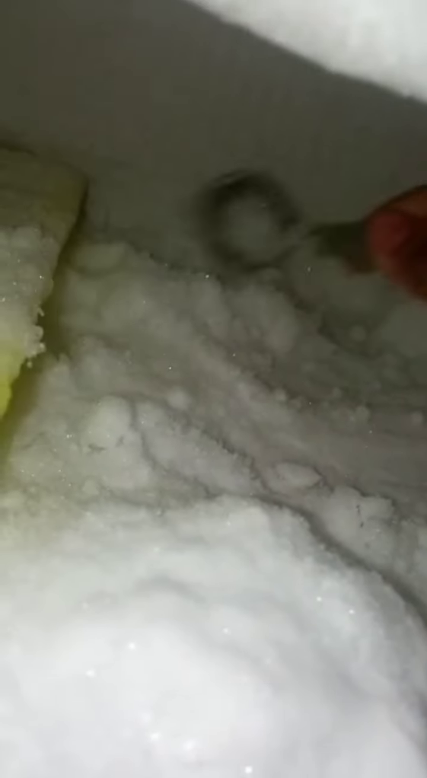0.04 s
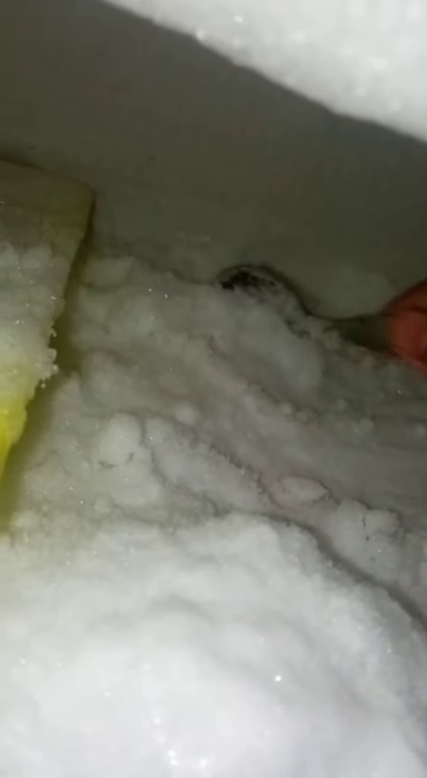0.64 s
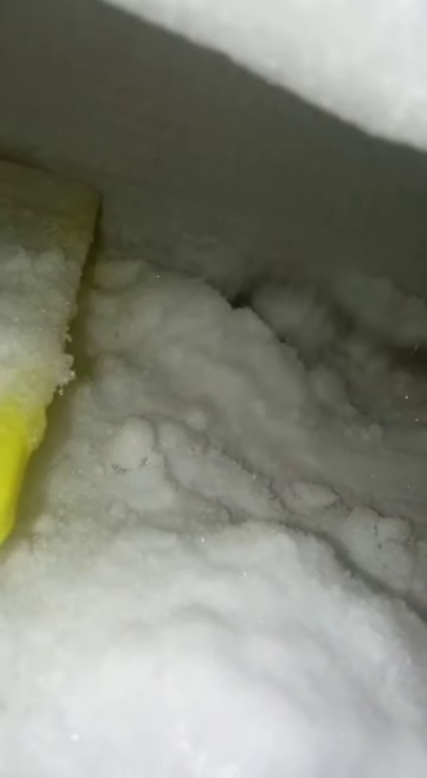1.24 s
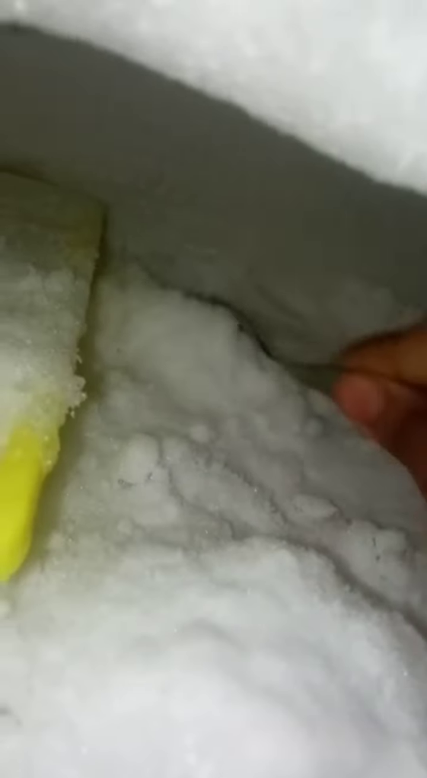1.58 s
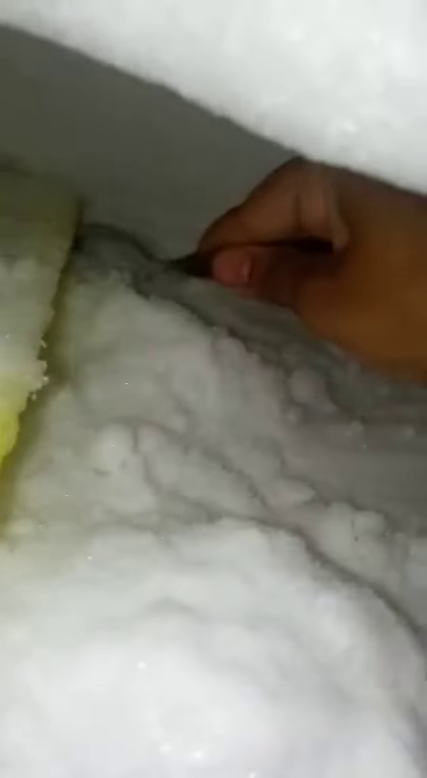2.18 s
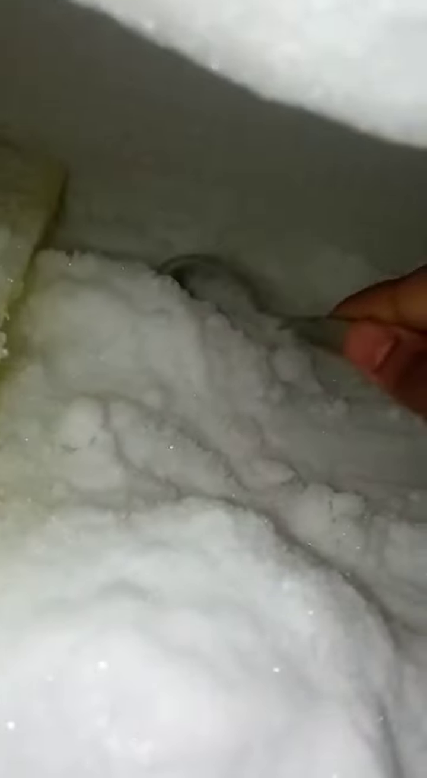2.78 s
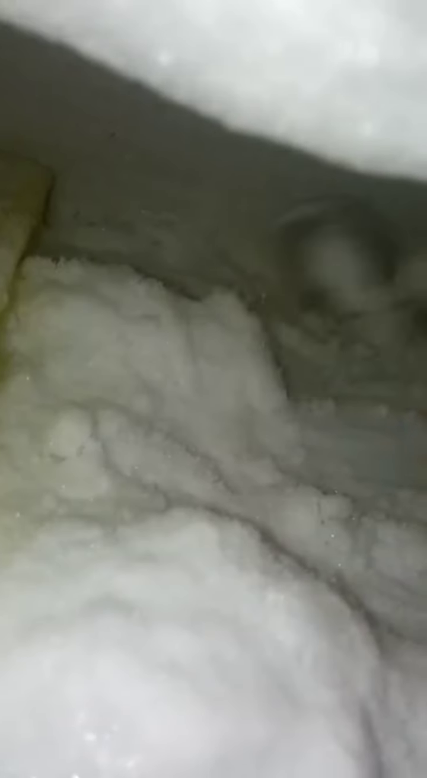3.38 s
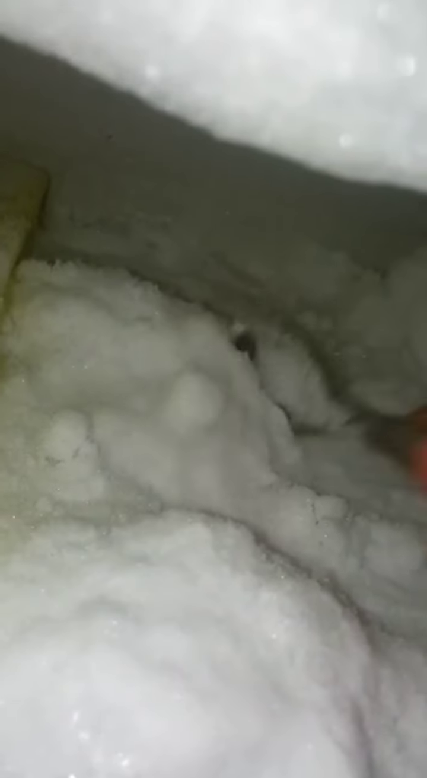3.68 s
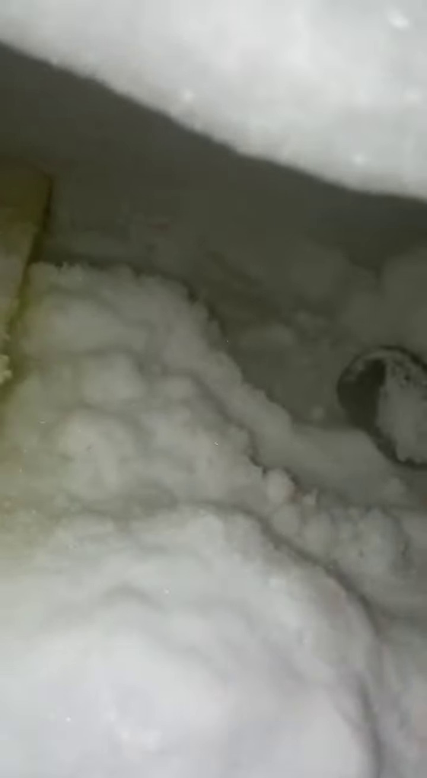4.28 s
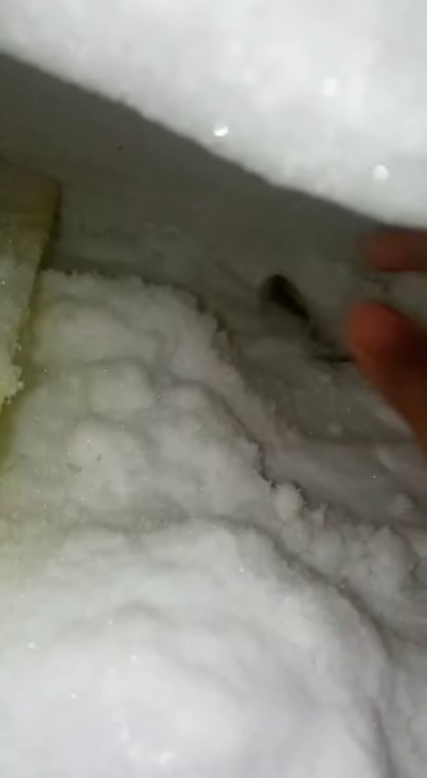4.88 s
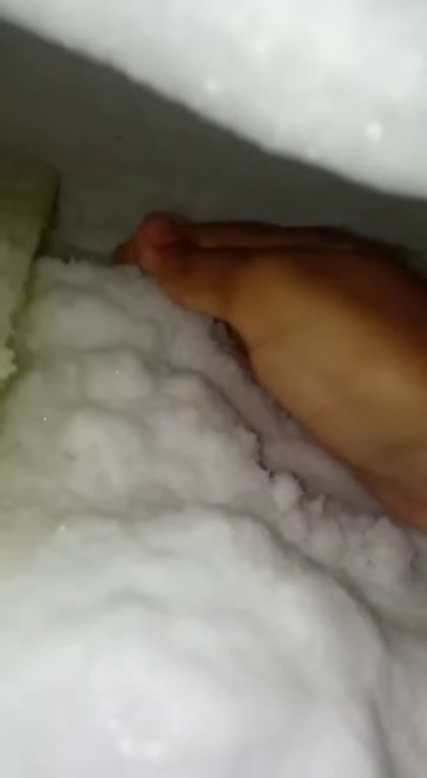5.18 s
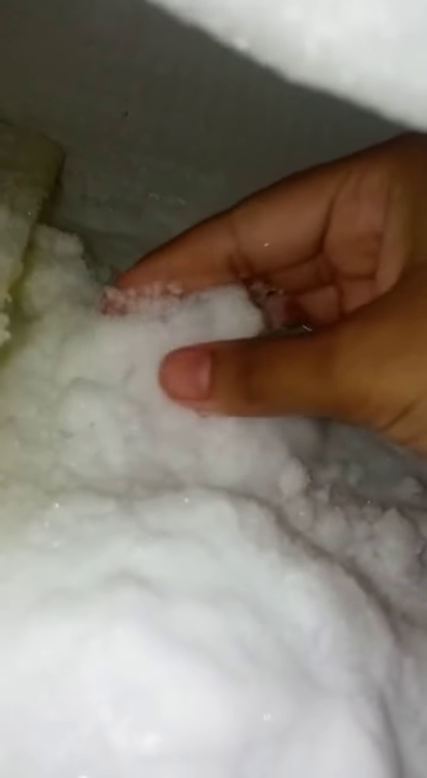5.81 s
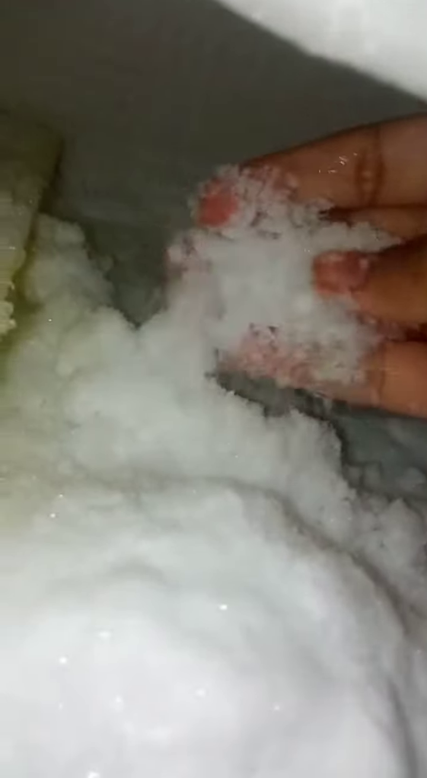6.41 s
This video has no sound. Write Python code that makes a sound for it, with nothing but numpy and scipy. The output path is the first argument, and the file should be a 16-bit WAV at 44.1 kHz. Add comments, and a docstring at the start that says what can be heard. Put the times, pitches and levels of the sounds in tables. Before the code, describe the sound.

A metal spoon jabs and scrapes thick freezer frost in crunchy strokes, clatters down, then fingers softly gather the loose crystals.

```python
"""Close up, a metal spoon jabs into thick freezer frost and drags it loose, stroke after stroke.
Each jab thuds in the hollow freezer wall; on each pull, breaking ice crystals fizz, rattle the spoon
and shake that wall. At 4.8 s the spoon is put down with a clatter and rings briefly.
From 5.1 s fingers softly gather the loose frost, over a low rumble and faint hiss heard throughout."""
import sys
import numpy as np
from scipy import signal
from scipy.fft import rfft, irfft
from scipy.io import wavfile
from scipy.ndimage import uniform_filter1d

SR = 44100
rng = np.random.default_rng(int(sys.argv[2]) if len(sys.argv) > 2 else 0)


def to_wav(s):
    """Save 16-bit WAV."""
    ch = np.atleast_2d(s).T  # columns
    pcm = np.round(np.clip(ch, -1, 1) * 32767)  # PCM
    wavfile.write(sys.argv[1], SR, pcm.astype(np.int16))


N = 293265
TIME = np.arange(N) / SR
HZ = np.fft.rfftfreq(16384, 1 / SR)  # frequency grid of the EQ curves


# pulls through the frost: (start [s], attack [s], hold [s], fizz level [dB], sag over the hold [dB],
# spoon rasp over fizz [dB], wall rumble over fizz [dB])
PULLS = [(0.0, 0.0013, 0.053, -53.5, 8.5, 4.5, 7.5), (0.078, 0.026, 0.086, -76, 3.5, 0.5, 12),
         (0.223, 0.022, .008, -51.5, -1, 4, 15), (0.287, 0.014, 0.098, -49.5, 10.5, 2, 3.5),
         (0.551, 0.03, 0.023, -43.5, 3.5, 4.5, 11), (0.601, 0.032, 0.13, -56, 4, 5.5, 11),
         (0.825, 0.015, 0.01, -44, 14, -2, 2), (1.018, 0.031, 0.017, -47, -1.5, 4.5, 9.5),
         (1.107, 0.022, .05, -56, 5, 6, 6.5), (1.181, .01, 0.083, -51, -0.5, 1, 2),
         (1.476, 0.077, 0.15, -47, 14, 5.5, 7), (1.699, 0.018, 0.049, -52.5, 11, 0, 3),
         (2.025, .01, 0.19, -59.5, 4, 8.5, 13), (2.167, .022, .225, -48, 4.5, 10, 10),
         (2.411, 0.026, 0.076, -43.5, 11, 5, 3.5), (2.764, 0.061, 0.14, -44, 18, 4.5, 8),
         (3.135, 0.16, 0.011, -49, -1, 4, 5.5), (3.32, 0.023, 0.057, -61.5, -1, 2, 8.5),
         (3.573, 0.066, 0.07, -45.5, 10, 6, 5.5), (3.748, 0.0094, 0.0082, -53, 11.5, -2.5, 3.5),
         (3.929, 0.059, 0.14, -45, 5.5, 5, 4), (4.142, 0.051, 0.0039, -52.5, 10.5, -3.5, 4),
         (4.35, 0.05, 0.027, -54, 12, 3, 2), (4.805, .008, .11, -64.5, 1.5, 4.5, 16.5),
         (4.936, 0.043, .004, -61.5, 8.5, 5.5, 15.5)]
def pull_envelopes():
    """How hard the pulls drive wall, spoon and crystals; the wall follows the force less steeply."""
    wall, spoon, ice = np.zeros((3, N))
    for start, attack_s, hold_s, fizz_db, sag_db, rasp_db, rumble_db in PULLS:
        force_db = stroke_db(attack_s, hold_s, sag_db)
        add(wall, start, amp(fizz_db + rumble_db + 0.64 * force_db) ** 2)  # overlaps sum in power
        add(spoon, start, amp(fizz_db + rasp_db + force_db) ** 2)
        add(ice, start, amp(fizz_db + force_db) ** 2)
    return np.sqrt([wall, spoon, ice])


def drag():
    """The edge sticks and slips through the frost: gritty forces on wall, spoon and crystals."""
    slip = evened(amp(1.45 * wander(rate_hz=70)))
    lumps = snaps(per_s=4000, spread_db=2.1)
    crystals = snaps(per_s=15000, spread_db=3.0)
    wall = evened(0.5 * lumps + snaps(per_s=5000, spread_db=-0.55))
    spoon = evened(lumps + 0.6 * crystals)
    flicker = amp(wander(rate_hz=330) + 0.5 * wander(rate_hz=26))
    ice = evened((crystals + 0.36 * lumps) * flicker)
    return slip * pull_envelopes() * np.array([wall, spoon, ice])


# jabs into the frost: (time [s], wall thud [dB], spoon clack [dB], ice crunch [dB], knock pitch [Hz])
JABS = [(0.2197, -34, -44.5, -52, 920), (0.5425, -29.5, -49.5, -55, 622), (1.0222, -34, -53, -52.5, 647),
        (1.1857, -42, -48.5, -46.5, 650), (1.4876, -28.5, -47.5, -56.5, 629),
        (2.0564, -34.5, -39, -61, 660), (2.0762, -41, -47.5, -59, 645), (2.7395, -29, -51, -54, 611),
        (3.1478, -47, -55, -54, 593), (3.5488, -28.5, -46, -54.5, 490), (3.9072, -45, -46.5, -51.5, 2400),
        (4.326, -50.5, -46, -52, 2470)]
# metal hits hard ice, last of all as the spoon is put down:
# (time [s], spoon clack [dB], knock [dB], knock pitch [Hz], wall thud [dB])
CLACKS = [(0.2963, -51, -49, 3245, -53), (2.215, -28, -29, 1085, -57), (2.2395, -38, -32.5, 2320, -36),
          (2.561, -61, -53.5, 1060, -44), (3.6621, -48.5, -44, 2827, -50), (3.9896, -64, -40.5, 2600, -57),
          (4.8109, -38, -39.5, 897, -38), (4.8134, -41.5, -33.5, 903, -33.5),
          (4.824, -42.5, -34, 482, -40.5), (4.8922, -45.5, -50, 2290, -37.5)]
def blows(jab_knock_over_thud_db=-6.5, chip_db=-58.5):
    """Each hit shoves the wall, clacks the spoon, crushes crystals and knocks on the struck spot."""
    wall, spoon, ice, knocks = np.zeros((4, N))
    hits = [(s, thud, clack, crunch, thud + jab_knock_over_thud_db, hz)
            for s, thud, clack, crunch, hz in JABS]
    hits += [(s, thud, clack, chip_db, knock_db, hz) for s, clack, knock_db, hz, thud in CLACKS]
    for s, thud_db, clack_db, crunch_db, knock_db, hz in hits:
        add(wall, s + 0.00064, amp(thud_db) * burst(decay_s=0.013, rise_s=0.00013, shove=1.0))
        add(spoon, s + 0.0003, amp(clack_db) * burst(decay_s=0.0073, rise_s=0.00052, shove=0.32))
        add(ice, s - 0.002, amp(crunch_db) * burst(decay_s=0.0049, rise_s=0.017))
        cycles = np.interp(knock_db, [-54, -45], [0.7, 3.1])  # a light touch is only a dry tick
        add(knocks, s + 0.00047, amp(knock_db) * knock(hz, cycles, rise_s=0.002))
    return np.array([wall, spoon, ice]), knocks


# tone of the fizz, with a glassy microphone peak near 15 kHz: (frequency [Hz], level [dB])
FIZZ_EQ = [(1200, -16.5), (3300, 5.5), (7300, 5.5), (7900, 4.5), (10800, -0.5), (11600, -5.5),
           (13700, -9.5), (14600, 2), (16000, -3.5)]
# bright resonances of the fizz, the top two being that microphone peak:
# (frequency [Hz], width [Hz], level [dB])
FIZZ_MODES = [(3340, 640, -2.5), (3974, 91, 4), (5020, 180, 5), (5698, 220, 3), (6320, 400, -0.5),
              (6603, 200, 7), (7000, 940, -3), (9120, 970, -3.5), (10300, 410, 2), (10700, 430, -13),
              (15200, 1900, 3.5), (15900, 1700, 5)]
# fader ride on the glassy top of the fizz: (time [s], trim [dB])
GLINT_RIDE = [(0.3, -1.5), (2.3, -3), (2.85, 0.5), (3.6, -2), (4.1, 0), (4.35, 10), (4.9, -4)]
def ice_fizz(force, glint_hz=10900):
    """Snapping crystals fizz through bright, drifting resonances; harder crushing lifts the top."""
    fizz = drifting_modes(force, FIZZ_MODES, FIZZ_EQ, shift=0.025, rate_hz=12)
    hz = np.fft.rfftfreq(N, 1 / SR) + 1
    top = irfft(rfft(fizz) / (1 + (glint_hz / hz) ** 24), N)
    envelope = np.sqrt(abs(uniform_filter1d(fizz ** 2, size=300)))
    expansion = (envelope / amp(-55)) ** 0.28
    return fizz - top + top * amp(automation(GLINT_RIDE)) * expansion


# where the frost bears on the spoon: (time [s], bowl over neck [dB])
BOWL_BLEND = [(0.1, -11), (0.35, -1.5), (0.6, -1), (0.7, -11.5), (1.06, -0.5), (1.2, -7.5), (1.6, -5.5),
              (2.4, -12), (2.85, -3), (3.3, -1), (3.65, -1), (4.05, 2.5), (4.4, 2.5), (4.9, -4)]
# resonances of the neck, pressed on the ice: (frequency [Hz], width [Hz], level [dB])
NECK_MODES = [(919, 43, 1.5), (1220, 22, -13), (1284, 34, 6), (1520, 60, 3.5), (1750, 90, -2),
              (1899, 210, -10), (2240, 92, 2), (3450, 160, -7.5), (4090, 130, -10)]
# resonances of the bowl: (frequency [Hz], width [Hz], level [dB])
BOWL_MODES = [(2460, 250, 1), (2630, 270, -8.5), (2902, 170, -13)]
# how the spoon radiates: (frequency [Hz], level [dB])
SPOON_EQ = [(100, -22), (500, -1), (900, 8.5), (4000, 0.5), (7000, -15.5), (12000, -38)]
def spoon_rasp(force):
    """A metallic rasp; as the contact moves, it crossfades between neck and bowl and the neck detunes."""
    share = amp(automation(BOWL_BLEND) + 3.8 * wander(rate_hz=20))
    neck = amp(1.0) * drifting_modes(force, NECK_MODES, SPOON_EQ, shift=0.026, rate_hz=13)
    bowl = through(force, resonances(BOWL_MODES) * eq(SPOON_EQ))
    return (neck + share * bowl) / np.hypot(1, share)


# boxy resonances of the frosted wall: (frequency [Hz], width [Hz], level [dB])
WALL_MODES = [(84, 28, -18.5), (132.7, 23, -5.5), (178.8, 20, -2), (222, 16, -12.5), (252.8, 8.4, 1.5),
              (277, 10, -3.5), (331.3, 26, -2), (382.2, 23, -3), (446.4, 17.5, 3.5), (502, 17, -1),
              (554, 26, -2.5), (592.5, 24, 0.5), (632.8, 39.4, 5.5), (670.6, 45, -22.5), (855, 19, -18),
              (943, 40, -5)]
# how the wall radiates: (frequency [Hz], level [dB])
WALL_EQ = [(25, -7.5), (55, 3), (90, 8), (650, 0.5), (1100, -6), (2200, -12.5), (6000, -34.5)]
def freezer_wall(force):
    """The hollow wall thuds under hits and rumbles under pulls."""
    return through(force, resonances(WALL_MODES) * eq(WALL_EQ))


# light touches between pulls: (time [s], level [dB], pitch [Hz])
TAPS = [(0.9474, -59, 864), (1.4374, -57.5, 885), (1.7728, -62, 986), (2.681, -66.5, 5860),
        (4.236, -47.5, 183.8)]
def taps():
    """Dry ticks, damped within a few cycles."""
    out = np.zeros(N)
    for s, db, hz in TAPS:
        add(out, s, amp(db) * knock(hz, cycles=0.8, rise_s=0.0006))
    return out


# faint hollow tones between strokes, then the ring of the spoon let go:
# (time [s], pitch [Hz], level [dB], 60 dB decay [s], rise [s])
RING_TONES = [(1.331, 300, -54.5, 0.94, 0.037), (1.34, 607, -57, 1, .02), (4.826, 6580, -51.5, 0.21, 0.013),
              (4.85, 5200, -55, 0.17, 0.007), (4.824, 3560, -60, 0.32, 0.005),
              (4.893, 2896, -66, 0.43, .004), (4.97, 7900, -79, 0.2, .004)]
def ring_outs():
    """Single modes swell and ring out freely."""
    out, t = np.zeros(N), TIME[:SR // 2]
    for s, hz, db, t60, rise_s in RING_TONES:
        envelope = amp(db - 60 * t / t60) * (1 - np.exp(-t / rise_s))
        add(out, s, envelope * np.sin(2 * np.pi * hz * t))
    return out


# finger scoops: (start [s], attack [s], hold [s], rustle level [dB], sag over the hold [dB],
# rub over rustle [dB], rustle centre [Hz])
SCOOPS = [(5.148, 0.42, 0.033, -68, 1, 3, 3190), (5.741, 0.092, 0.12, -65, 0.5, -2, 5810),
          (5.96, 0.025, 0.18, -79.5, 2.5, 4, 5020), (6.106, 0.14, 0.037, -68.5, 1, -5, 5220),
          (6.484, 0.017, .14, -69.5, -7, -15, 5090)]
# crisp tone of the rustle, with the microphone peak near 15 kHz: (frequency [Hz], level [dB])
RUSTLE_EQ = [(1000, -16), (2700, -9), (3400, 4.5), (4600, 0), (5100, 2.5), (6500, 1.5), (7900, -5.5),
             (9200, -4.5), (11000, -15.5), (12500, -31), (13800, -34.5), (15300, -13.5)]
# dull tone of the packed pile: (frequency [Hz], level [dB])
PILE_EQ = [(100, -5.5), (300, -8.5), (620, 2.5), (780, -9.5), (920, -1), (1100, -10), (2400, -3.5),
           (4000, -5.5), (9000, -36)]
def fingers(hump_db=4.5, hump_width_hz=600):
    """Loose crystals crumble in soft clumps; pressing rubs the packed pile beneath."""
    out = np.zeros(N)
    clumps = evened(amp(1.48 * wander(rate_hz=52)))
    grains = clumps * snaps(per_s=4000, spread_db=4.0)
    friction = clumps * snaps(per_s=5900, spread_db=1.0)
    for start, attack_s, hold_s, rustle_db, sag_db, rub_db, hz in SCOOPS:
        force = amp(rustle_db + stroke_db(attack_s, hold_s, sag_db))
        span = (round(start * SR) + np.arange(len(force))) % N
        hump = amp(hump_db / (1 + ((HZ - hz) / hump_width_hz) ** 2))
        rustle = through(force * grains[span], eq(RUSTLE_EQ) * hump)
        rub = through(force * friction[span], eq(PILE_EQ))
        add(out, start, rustle + amp(rub_db) * rub)
    return out


def crumbs():
    """Loosened crumbs drop onto the pile now and then with tiny ticks."""
    return through(amp(-98) * snaps(per_s=7, spread_db=3), eq(RUSTLE_EQ))


# bounces off the nearest frosted surfaces: (delay [s], gain [linear])
REFLECTIONS = [(.0011, 0.2), (.0023, -0.51), (.0037, 0.38), (.0056, .25)]
def with_reflections(x):
    """Early reflections comb the treble."""
    out = x.copy()
    for delay, gain in REFLECTIONS:
        add(out, delay, gain * x)
    return out / np.sqrt(1 + sum(gain ** 2 for _, gain in REFLECTIONS))


# reverb time of the compartment: (frequency [Hz], 60 dB decay [s])
REVERB_DECAY = [(100, 0.12), (600, 0.64), (1800, 0.42), (6000, 0.24), (15000, 0.08)]
def freezer_reverb(x):
    """The compartment's short, dense tail hangs longest in the mids."""
    hz, t, noise = signal.stft(rng.standard_normal(SR // 2), SR, nperseg=256)
    t60 = at_frequency(REVERB_DECAY, hz)[:, None]
    _, tail = signal.istft(noise * amp(-60 * t / t60), SR)
    return signal.oaconvolve(x, tail / np.linalg.norm(tail))[:N]


# fader ride on the rumble: (time [s], level [dB])
RUMBLE_RIDE = [(0, -69.5), (1.9, -83.5), (3.8, -79), (4.3, -60.5), (4.75, -72.5), (5.9, -72.5), (6.2, -68),
               (6.65, -73.5)]
# tone of the rumble: (frequency [Hz], level [dB])
RUMBLE_EQ = [(20, -31), (45, -21.5), (70, 2.5), (105, -0.5), (160, -12.5), (300, -24), (1000, -55.5)]
# tone of the hiss: (frequency [Hz], level [dB])
HISS_EQ = [(100, 0.5), (600, 4), (1000, 0.5), (4000, -2), (7000, -8.5), (11000, -22), (15000, -18.5)]
def room_tone():
    """A bed of low, uneven rumble and faint hiss."""
    rumble = amp(automation(RUMBLE_RIDE)) * through(rng.standard_normal(N), eq(RUMBLE_EQ))
    hiss = amp(-87.5) * through(rng.standard_normal(N), eq(HISS_EQ))
    return rumble + hiss


def stroke_db(attack_s, hold_s, sag_db, release_db_per_s=479, trickle_db=-35, trickle_db_per_s=96.5):
    """Envelope of one movement: swell, sagging hold, release, then loosened grains trickle on."""
    t = TIME[:SR]
    swell = 20 * np.log10(np.clip(t / attack_s, 1e-4, 1))
    sag = sag_db * np.clip((t - attack_s) / hold_s, 0, 1)
    after = np.maximum(t - attack_s - hold_s, 0)
    return swell - sag + np.maximum(-release_db_per_s * after, trickle_db - trickle_db_per_s * after)


def snaps(per_s, spread_db):
    """A crackle of tiny fractures, random in time and size."""
    size = amp(spread_db * np.minimum(rng.exponential(1, N), 4))
    return evened(size * rng.choice([-1, 1], N) * (rng.random(N) < per_s / SR))


def burst(decay_s, rise_s, shove=0):
    """A clump of fractures dies away; shove puts one clean click at its front."""
    t = TIME[:SR // 10]
    x = rng.standard_normal(len(t)) * np.exp(-t / decay_s) * (1 - np.exp(-t / rise_s))
    x[0] -= shove * np.linalg.norm(x)
    return unit_hit(x)


def knock(hz, cycles, rise_s):
    """The struck spot rings for a few cycles before the frost damps it."""
    t = TIME[:SR // 10]
    envelope = np.exp(-t * hz / cycles) * (1 - np.exp(-t / rise_s))
    return unit_hit(np.sin(2 * np.pi * hz * t) * envelope)


def drifting_modes(force, modes, tone, shift, rate_hz):
    """Rings resonances that drift up and down by the fraction shift."""
    drift = np.clip(0.9 * wander(rate_hz), -1, 1)
    out = np.zeros(N)
    for side in (-1, 0, 1):
        detuned = [(hz * (1 + side * shift), width, db) for hz, width, db in modes]
        crossfade = np.maximum(1 - abs(drift - side), 0)
        out += through(force * crossfade, resonances(detuned) * eq(tone))
    return out


def resonances(modes):
    """Gain over frequency of these modes together."""
    f = HZ + 1
    powers = (amp(db) ** 2 / (1 + ((f * f - hz * hz) / (f * width)) ** 2) for hz, width, db in modes)
    return np.sqrt(sum(powers))


def through(x, gain):
    """Minimum-phase filter of unit energy: a click keeps its sharp attack and rings down."""
    log_gain = np.log(np.maximum(np.r_[gain, gain[-2:0:-1]], 1e-5))
    response = np.exp(np.conj(signal.hilbert(log_gain)))
    impulse = np.fft.ifft(response).real[:len(gain) // 2]
    return signal.oaconvolve(x, impulse / np.linalg.norm(impulse))[:N]


def wander(rate_hz):
    """Smooth random modulation of rms 1, moving up to the given rate."""
    hz = np.fft.rfftfreq(N, 1 / SR)
    return evened(irfft(rfft(rng.standard_normal(N)) / (1 + (hz / rate_hz) ** 4), N))


def amp(db):
    """Decibels to gain."""
    return 10 ** (np.asarray(db) / 20)


def evened(x):
    """Scales to an rms of 1."""
    return x / np.sqrt(np.mean(x ** 2) + 1e-20)


def unit_hit(x, span_s=0.016):
    """Gives a hit the energy of 0 dB held for span_s."""
    return x / np.linalg.norm(x) * np.sqrt(span_s * SR)


def at_frequency(points, hz):
    """Reads a table along a log-frequency axis."""
    f, value = np.transpose(points)
    return np.interp(np.log(hz + 1), np.log(f), value)


def eq(points):
    """Gain over frequency from breakpoints in dB."""
    return amp(at_frequency(points, HZ))


def automation(points):
    """A sample-by-sample curve through breakpoints in time."""
    return np.interp(TIME, *np.transpose(points))


def add(mix, s, sound):
    """Mixes a sound in at time s."""
    part = mix[round(s * SR):][:len(sound)]
    part += sound[:len(part)]


def scene():
    """Wall, spoon and ice answer the same strokes; only the frost's treble has any width."""
    hit_forces, knocks = blows()
    wall_force, spoon_force, ice_force = drag() + hit_forces
    frost = ice_fizz(ice_force) + fingers() + crumbs()
    scrape = with_reflections(spoon_rasp(spoon_force) + frost)
    near = scrape + freezer_wall(wall_force) + knocks + taps() + ring_outs()
    mid = near + amp(-20.5) * freezer_reverb(near) + room_tone()
    treble = signal.sosfilt(signal.butter(4, 6500, "high", fs=SR, output="sos"), frost)
    side = amp(-21) * with_reflections(np.roll(treble, SR // 300))  # a late sideways bounce
    return np.array([mid + side, mid - side])


def record(dry):
    """A steep high cut at 16.1 kHz."""
    high_cut = signal.firwin(511, 16100, window=("kaiser", 9), fs=SR)
    return signal.oaconvolve(dry, high_cut[None], "same")


dry = scene()
out = record(dry)
to_wav(out)
```